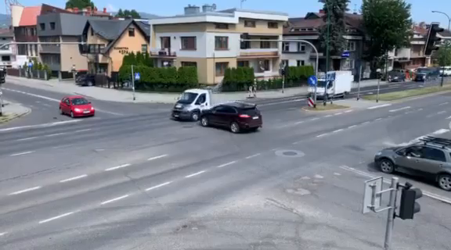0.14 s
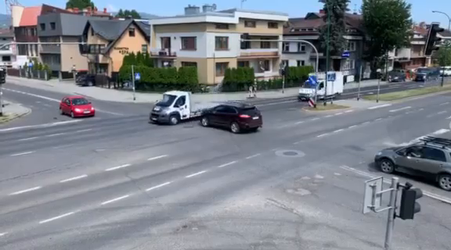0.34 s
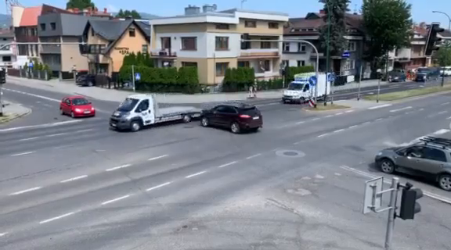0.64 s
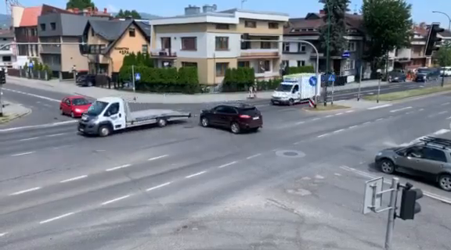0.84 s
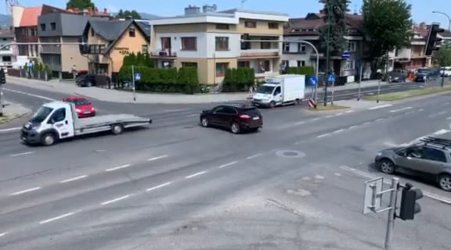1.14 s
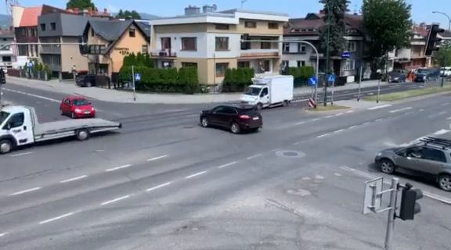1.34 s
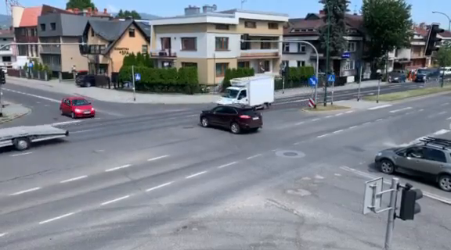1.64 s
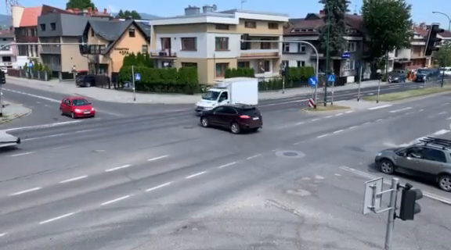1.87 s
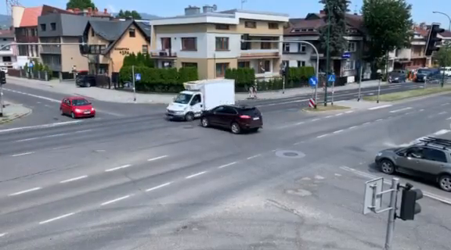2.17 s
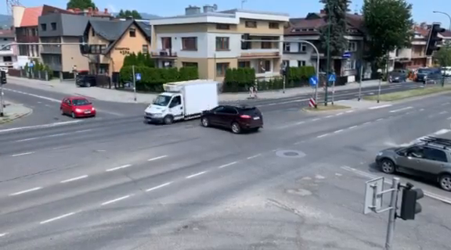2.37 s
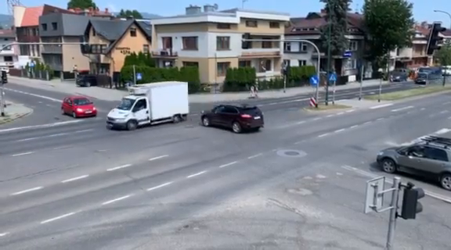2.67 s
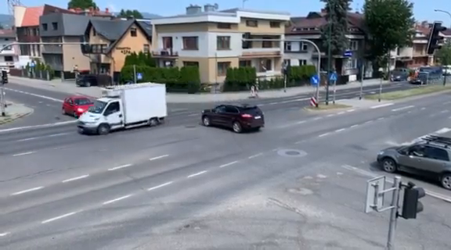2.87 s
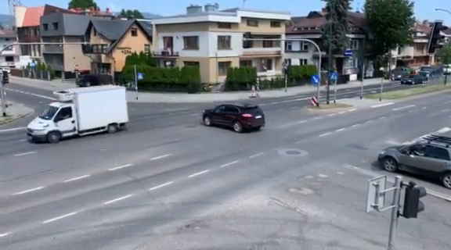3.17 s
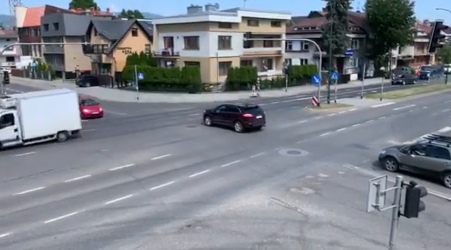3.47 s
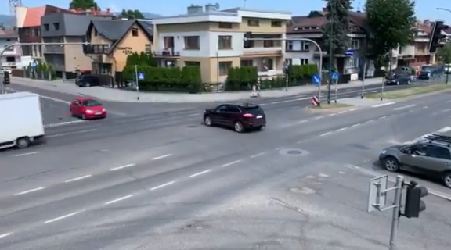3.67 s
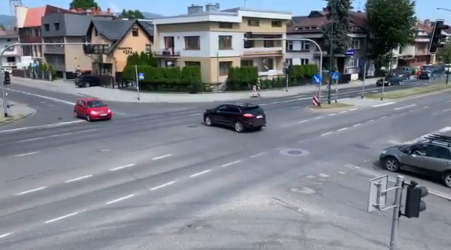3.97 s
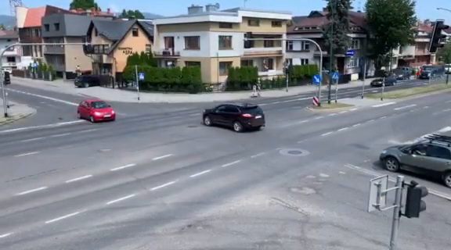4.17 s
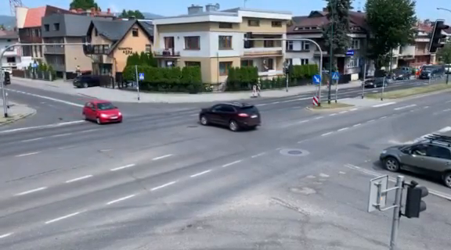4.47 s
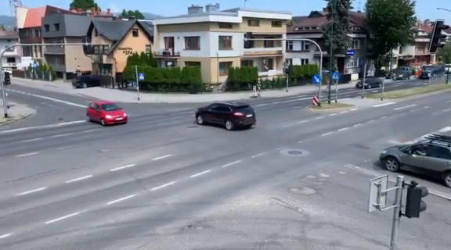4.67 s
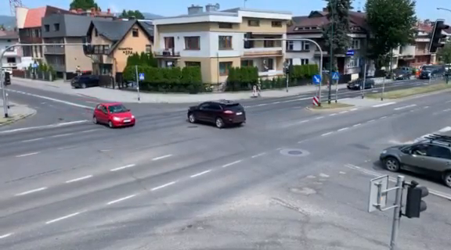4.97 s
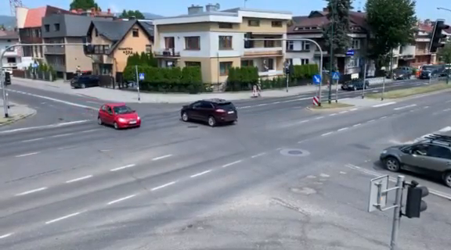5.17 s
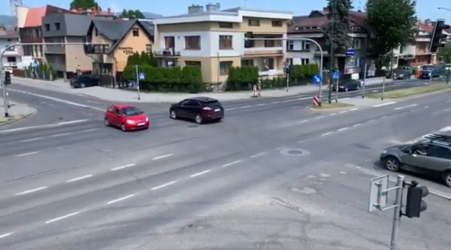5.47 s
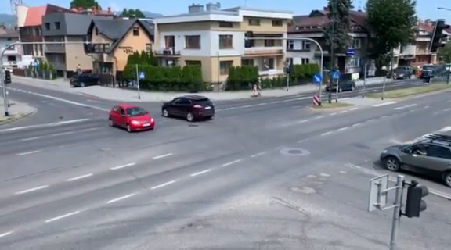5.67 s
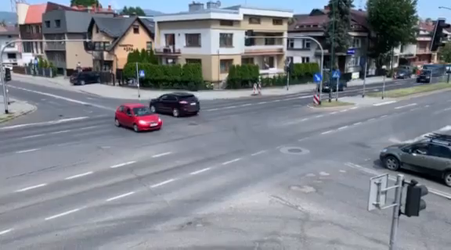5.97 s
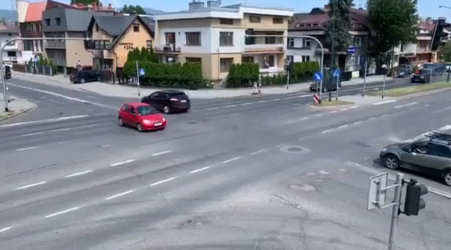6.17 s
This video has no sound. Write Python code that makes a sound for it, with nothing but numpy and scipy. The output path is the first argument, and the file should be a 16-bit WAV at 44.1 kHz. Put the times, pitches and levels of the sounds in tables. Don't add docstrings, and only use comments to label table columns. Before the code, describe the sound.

At a wide outdoor junction heard from above, a light flatbed truck sweeps left with exhaust drone, rising gear whine and bright tyre roar, then a dull bang of its load bed. A box truck follows with a deeper, climbing engine pull and fan whirr, and a softer double knock. A car idles close by, traffic passes on the right, and a brake moans faintly near the end.

```python
import sys
import numpy as np
from scipy import signal
from scipy.fft import rfft, irfft
from scipy.io import wavfile
from scipy.ndimage import uniform_filter1d, minimum_filter1d, map_coordinates

SR = 44100
rng = np.random.default_rng(int(sys.argv[2]) if len(sys.argv) > 2 else 0)


def amplitude_ratio(level_db):
    exponent = np.asarray(level_db, float) / 20
    return 10 ** exponent


def inscribe(sig):
    pcm = np.round(np.clip(np.atleast_2d(sig).T, -1, 1) * 32767)
    wavfile.write(sys.argv[1], SR, pcm.astype(np.int16))


N = 278712
TIME = np.arange(N) / SR

# (frequency [Hz], level [dB per Hz])
TYRES = [(71, -30), (120, -5), (397, -3.5), (491, -13), (596, -14.5), (766, -15.5), (1130, -16),
         (1310, -16), (1820, -21.5), (3320, -16.5), (6520, -31.5), (7910, -26.5), (10200, -25),
         (11400, -16), (12100, -75), (15700, -83), (22000, -120)]


def rms_one(x):
    return x / np.sqrt(np.mean(x ** 2) + 1e-20)


def in_time(rows, fade_db=0.):
    s, *columns = np.transpose(rows)
    outside = np.maximum(s[0] - TIME, 0) + np.maximum(TIME - s[-1], 0)
    return [np.interp(TIME, s, c) - fade_db * outside for c in columns]


def at_hz(points, hz):
    point_hz, db = np.transpose(points)
    return np.interp(np.log(hz), np.log(point_hz), db)


def swell(s, length, power):
    return np.exp(-((TIME - s) / (length / 2)) ** power)


def drift(rate):
    r = np.exp(-80 * np.pi * rate / SR)
    white = rng.standard_normal(N // 40 + 2002)
    slow = signal.lfilter([1], [1, -2 * r, r * r], white)[2000:]
    return np.interp(np.arange(N) / 40, np.arange(len(slow)), rms_one(slow))


def bands(spectrum, low_hz, patchy_db, channels):
    # (frequency [Hz], unevenness [dB])
    lumps = [(100, .8), (180, 2), (350, 2.2), (600, .3), (9000, .3)]
    edges = np.geomspace(low_hz, 13000, 22)
    white = rng.standard_normal((2, channels, N))
    together = drift(4.2)
    for k, (low, high) in enumerate(zip(edges, edges[1:])):
        hz = np.sqrt(low * high)
        flicker = (patchy_db + at_hz(lumps, hz)) * (.4 * together + drift(7))
        band_pass = signal.butter(2, [low, high], "band", fs=SR, output="sos")
        yield hz, amplitude_ratio(at_hz(spectrum, hz) + flicker) * signal.sosfilt(band_pass, white[k % 2])


def narrow(hz, width_hz):
    r = np.exp(-np.pi * width_hz / SR)
    stage = [1, 0, -1, 1, -2 * r * np.cos(2 * np.pi * hz / SR), r * r]
    return rms_one(signal.sosfilt([stage, stage], rng.standard_normal(N)))


def spaced(x, lead):
    ears = [np.arange(N) + side * lead / 2 for side in (1, -1)]
    return np.array([map_coordinates(x, [at], order=3, mode="nearest") for at in ears])


def drone(rows, orders_db, wobble, flutter_db):
    hz = in_time(rows)[0] * (1 + wobble * drift(6.05))
    phase = 2 * np.pi * np.cumsum(hz) / SR
    level_db = in_time(rows, fade_db=148)[1]
    out = np.zeros(N)
    for k, db in enumerate(orders_db, 1):
        level = np.sqrt(2) * amplitude_ratio(level_db + db + flutter_db * drift(6.0))
        out += level * np.sin(k * phase + k * k)
    return out


def rolling(rows, colour_db, firing_hz, knock, fade_db):
    region_hz = [300, 1200, 4200, 9200]
    near_share = [0.598, 1, 1.01, 1.5]
    load_share = [0.19, 0.082, 0.72, 1.1]
    usual_db = -42.5
    near_db, load_db = in_time(rows, fade_db)[0] - usual_db, in_time(rows)[1]
    pulse = 1 + knock * np.cos(2 * np.pi * np.cumsum(firing_hz) / SR)
    parts = list(bands(TYRES, 110.4, patchy_db=1.2, channels=1))
    region = [np.argmin(abs(np.log(hz / np.array(region_hz)))) for hz, noise in parts]
    out = np.zeros(N)
    for k, db in enumerate(colour_db):
        noise = rms_one(sum(n[0] for (hz, n), r in zip(parts, region) if r == k))
        level = amplitude_ratio(usual_db + db + near_share[k] * near_db + load_share[k] * load_db)
        out += level * noise * (pulse if k else 1)
    return out


def town():
    # (frequency [Hz], level [dB per Hz])
    colour = [(15, -37), (25, -21.5), (80, -6.5), (225, -13), (398, -19), (668, -19.5), (1340, -24.5),
              (1830, -25.5), (2770, -32.5), (3230, -35.5), (4410, -37), (6500, -38), (7790, -35.5),
              (10400, -74.5), (12100, -88), (15700, -91), (22000, -120)]
    # (time [s], level [dB])
    loudness = [(0.0, -27.5), (6.32, -33)]
    # (frequency [Hz], correlation [-1 to 1])
    likeness = [(60, 1), (130, 0.81), (270, 0.068), (570, -0.37), (1200, -0.26), (2600, 0.13),
                (11000, -0.055)]
    out = 0
    for hz, (mid, side) in bands(colour, 23.86, patchy_db=1.5, channels=2):
        alike = np.clip(at_hz(likeness, hz), -1, 1)
        out = out + np.sqrt(1 + alike) * mid + np.sqrt(1 - alike) * side * np.array([[1], [-1]])
    return amplitude_ratio(in_time(loudness)[0]) * rms_one(out)


def brake_moans():
    # (time [s], length [s], pitch [Hz], level [dB])
    moan_rows = [
        (4.98, 0.3, 930, -46),
        (5.6, .25, 920, -49),
        (6.15, 0.2, 945, -46),
    ]
    moan = sum(amplitude_ratio(db) * narrow(hz, width_hz=70) * swell(s, length, 4) for s, length, hz, db in moan_rows)
    return moan * amplitude_ratio(np.array([[-2.5], [1.5]]))


def right_lanes():
    # (time [s], level [dB], lead of the left microphone [samples])
    passing = [(0, -45.5, -9.5), (1.5, -42.5, -8.5), (2.3, -54.5, -13), (3.2, -39.5, -21.5),
               (4.5, -46.5, -21.5), (5.5, -49.5, -25), (6.32, -61, -6.5)]
    # (time [s], pitch [Hz], level [dB])
    leaving = [
        (0, 594, -38.5),
        (.12, 603, -47.5),
        (.2, 580, -52),
    ]
    level_db, lead = in_time(passing)
    roar = rms_one(sum(n[0] for hz, n in bands(TYRES, 401, patchy_db=1.5, channels=1)))
    whine = drone(leaving, [0], wobble=0.0051, flutter_db=2.0)
    return spaced(amplitude_ratio(level_db) * roar + whine, lead) + brake_moans()


def idling_car():
    # (time [s], firing rate [Hz], level [dB])
    firing = [(0, 25, -30), (.5, 25.14, -45), (.8, 25.23, -35), (1.0, 25.2, -41), (1.3, 25.08, -36),
              (1.6, 25.5, -25), (2.2, 24.95, -31), (2.5, 25.22, -31), (2.9, 25.1, -28.5), (3.3, 25.27, -26),
              (3.8, 25.27, -24.5), (4.5, 24.59, -24.5), (4.95, 24.9, -33), (5.25, 24.91, -23),
              (5.7, 24.75, -29), (6.32, 25.09, -27.5)]
    orders_db = [-29, -8.5, -10.5, -11.5, -23.5, -20.5, -18]
    return drone(firing, orders_db, wobble=0.0041, flutter_db=1.5)


def bed_jolts():
    # (time [s], peak [dB], left over right [dB], thud share [dB])
    seam_hits = [
        (1.472, -16, 7, -20),
        (3.582, -22, 11, -6),
        (3.62, -24, -1, -5),
    ]
    # (frequency [Hz], level [dB], decay by 60 dB [s])
    modes = [(263, -27, .03), (400, 7.5, 0.015), (873, -10, 0.024), (976, -8, 0.02), (1440, -20.5, 0.015)]
    out = np.zeros((2, N))
    spreads = rng.normal(0, 0.34, (len(seam_hits), len(modes)))
    for (s, peak_db, pan_db, thud_db), spread in zip(seam_hits, spreads):
        t = np.maximum(TIME - s, 0)
        rise = 1 - np.exp(-t / 0.0022)
        pan = amplitude_ratio(pan_db / 2 * np.array([[1], [-1]]))
        for (hz, db, t60), own_db in zip(modes, spread):
            level = amplitude_ratio(peak_db + 7.5 + db + own_db + thud_db * (hz < 600) - 60 * t / t60)
            out += rise * level * np.sin(2 * np.pi * hz * t) * pan
    return out


def flatbed_truck():
    # (time [s], firing rate [Hz], level [dB])
    engine = [(0, 92.4, -33.5), (.3, 94.7, -29.5), (.5, 96.86, -30.5), (.75, 99.6, -28.5),
              (.92, 99.76, -30.5), (1.05, 102.6, -45.5), (1.33, 100.9, -29.5), (1.5, 101.7, -44),
              (2.3, 102.5, -58)]
    orders_db = [2, -8.5, -10.5]
    # (time [s], pitch [Hz], level [dB])
    gears = [(.1, 526, -50), (.2, 535, -38), (.6, 575, -38), (.97, 610, -38), (1.06, 618, -50)]
    # (time [s], tyre level [dB], engine load [dB])
    roll = [(0, -48, -1), (.27, -32, -17.5), (.96, -27, -18), (1.1, -30, -16.5), (1.3, -34, -15.5),
            (1.75, -31, -36), (1.88, -42.5, -29.5), (2.04, -40, -16), (2.6, -31, -21)]
    colour_db = [2, -3.5, 0, -3]
    # (time [s], lead of the left microphone [samples])
    bearing = [(0, 4.5), (.3, 6.2), (.55, 6.6), (1.05, 6.9), (1.15, 9.6), (1.8, 13), (2.5, 18), (3.7, 23)]
    truck = drone(engine, orders_db, wobble=0.006, flutter_db=1.5)
    truck += drone(gears, [0, -10], wobble=0.006, flutter_db=3.5)
    truck += rolling(roll, colour_db, in_time(engine)[0], knock=0.08, fade_db=28.0)
    return spaced(truck, *in_time(bearing))


def fan_whirrs():
    # (time [s], length [s], centre [Hz], width [Hz], level [dB])
    whirr_rows = [
        (3.149, 0.84, 1664, 249.5, -39.5),
        (3.551, 0.87, 4360, 477.8, -53),
        (4.674, 0.92, 2778, 300.7, -48.5),
    ]
    return sum(amplitude_ratio(db) * narrow(hz, width) * swell(s, length, 2) for s, length, hz, width, db in whirr_rows)


def box_truck():
    # (time [s], firing rate [Hz], level [dB])
    engine = [(0, 48.5, -48), (.6, 50.9, -40), (.85, 53.78, -28), (1.05, 52.1, -46), (1.3, 54.05, -34),
              (1.65, 56.56, -46), (1.95, 56.8, -23.5), (2.15, 58.07, -43), (2.35, 58.76, -30),
              (2.82, 60.55, -22), (3.24, 62.33, -25), (3.42, 63.8, -19), (3.63, 65.3, -18.5),
              (4.43, 69.1, -22), (4.75, 70.54, -37.5), (5.0, 72.52, -36.5), (5.25, 73.1, -26.5),
              (5.62, 75.75, -25), (5.86, 75.63, -27.5), (6.2, 77, -23.5), (6.32, 77.4, -20.5)]
    orders_db = [-1.5]
    # (time [s], level [dB])
    intake_level = [(.8, -50), (1.3, -36), (2.3, -36), (2.8, -44), (3.5, -39), (4.3, -35), (4.6, -38),
                    (4.9, -33), (5.3, -38), (5.8, -37), (6.1, -44), (6.32, -44)]
    # (time [s], tyre level [dB], engine load [dB])
    roll = [(1.8, -52.5, -9), (2.3, -47, 4), (2.9, -47, 12), (3.3, -43, 7), (3.7, -42, 5.5),
            (4.2, -43.5, 2), (4.7, -46, 12), (5.1, -45.5, 11.5), (5.8, -46, 6), (6.32, -45, -1)]
    colour_db = [6, 3, -6, -35.5]
    # (time [s], lead of the left microphone [samples])
    bearing = [(0, 1), (2.2, 5.6), (2.6, 6.2), (3.1, 7), (3.45, 9), (3.9, 12.2), (4.2, 13.3), (4.6, 16.3),
               (5.1, 17.6), (5.5, 19), (6.32, 20)]
    truck = drone(engine, orders_db, wobble=0.005, flutter_db=.8)
    engine_s, firing_hz = np.transpose(engine)[:2]
    intake = [(s, 2 * np.interp(s, engine_s, firing_hz), db) for s, db in intake_level]
    truck += drone(intake, [0], wobble=0.0062, flutter_db=0.5)
    truck += rolling(roll, colour_db, in_time(engine)[0], knock=0.054, fade_db=-4.5)
    return spaced(truck + fan_whirrs(), *in_time(bearing))


def scene():
    background = town() + right_lanes() + idling_car()
    return background + bed_jolts() + flatbed_truck() + box_truck()


def colour_sides(dry):
    # (frequency [Hz], width [Hz], level [dB])
    port_ring = (5450, 300, -56)
    # (frequency [Hz], side over mid [dB])
    side_over_mid = [(250, 0), (700, -1), (2500, -1.5), (4900, 0), (5700, 1), (6500, -2), (7100, -1.5),
                     (7800, 3.5), (8600, 2), (9400, 2.5), (10000, -2), (10700, -3.5), (12000, -4)]
    # (frequency [Hz], left over right [dB])
    port_balance = [(60, -.1), (110, .2), (190, 0.5), (350, -1), (620, 3.0), (1120, 2.0), (2010, 0),
                    (3610, -1.0), (6490, -1.5), (11600, 0.5)]
    treble_from_hz, treble_lag_s = 5200, .025
    ring_hz, width_hz, ring_db = port_ring
    ring = amplitude_ratio(ring_db) * narrow(ring_hz, width_hz) * np.array([[-.3], [1]])
    left, right = rfft(dry + ring)
    hz = np.maximum(np.arange(len(left)) * SR / N, 1)
    right = right * np.exp(-2j * np.pi * treble_lag_s * np.maximum(hz - treble_from_hz, 0))
    tilt, lean = amplitude_ratio(at_hz(side_over_mid, hz) / 2), amplitude_ratio(at_hz(port_balance, hz) / 2)
    mid, side = (left + right) / 2 / tilt, (left - right) / 2 * tilt
    return irfft(np.array([(mid + side) * lean, (mid - side) / lean]), N)


def thin_stereo(pair):
    edges_hz = np.r_[np.geomspace(450, 6000, 40),
                6350, 6700, 7100, 7550, 8250, 9000, 9650, 10300, 11000, 11400, 11800]
    # (frequency [Hz], floor over the stronger band's mean [dB])
    line_floor = [(400, -22), (1000, -13), (2000, -8), (3200, -4.5), (5000, -4.5), (7500, -6), (9600, -6),
                  (11000, -4), (11800, 1)]
    mute_below_db, mute_scatter_db, top_leak_db, floor_scatter_db = -6, 5, -60, 3.5
    treble_eager_db, bass_spared_db = 1, 3
    shift = 293
    padded = np.pad(pair, ((0, 0), (shift, 0)))
    hz, s, z = signal.stft(padded, SR, "cosine", nperseg=2048)
    band = np.searchsorted(edges_hz, hz)
    band_top = np.r_[edges_hz, SR][:, None, None]
    treble, bass = band_top > 6500, band_top < 2000
    power = np.array([np.sum(abs(z[:, band == k]) ** 2, axis=1) for k in range(band.max() + 1)]) + 1e-20
    power = uniform_filter1d(power, size=2)
    under_db = 10 * np.log10(power / power[:, ::-1])

    chance = rng.standard_normal((len(power), 1, len(s)))
    chance = chance + 2 * treble * rng.standard_normal(len(s))
    scatter_db = mute_scatter_db * uniform_filter1d(chance, size=2) / (1 + .5 * treble)
    limit_db = mute_below_db + treble_eager_db * treble - bass_spared_db * bass + scatter_db
    keep = (under_db > np.minimum(limit_db, 0)) * 1.
    keep = minimum_filter1d(keep, size=2)
    keep[0], keep[-1] = 1, amplitude_ratio(top_leak_db)

    scatter = amplitude_ratio(floor_scatter_db * rng.standard_normal((len(power), len(s))))
    mean = (power.max(axis=1) / np.bincount(band)[:, None] * scatter)[band]
    strong = abs(z) ** 2 > mean * amplitude_ratio(2 * at_hz(line_floor, np.maximum(hz, 1)))[:, None]
    thinned = z * strong * keep[band].transpose(1, 0, 2)
    return signal.istft(thinned, SR, "cosine", nperseg=2048)[1][:, shift:shift + N]


def high_whistle():
    # (time [s], length [s], pitch [Hz], level [dB])
    whistle_row = (5.9, .35, 12240, -76)
    s, length, hz, db = whistle_row
    return amplitude_ratio(db) * narrow(hz, width_hz=40) * swell(s, length, 8)


def low_pass(x):
    return signal.sosfilt(signal.butter(12, 12250, fs=SR, output="sos"), x)


def record(dry):
    left, right = colour_sides(dry)
    mid, side = thin_stereo(np.array([left + right, left - right]) / 2)
    mix = np.array([mid + side + high_whistle(), mid - side])
    return low_pass(mix)


dry = scene()
out = record(dry)
inscribe(out)
```